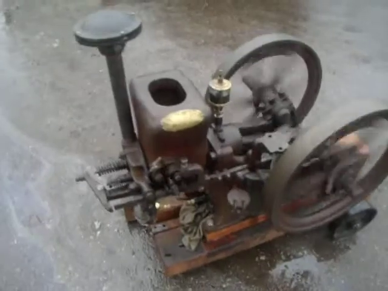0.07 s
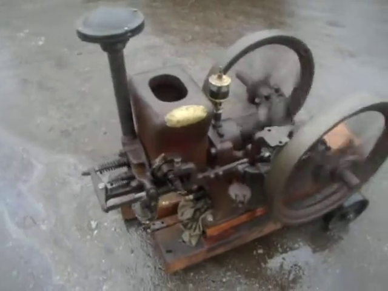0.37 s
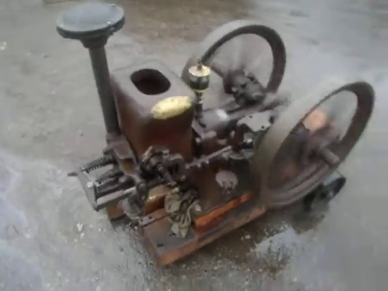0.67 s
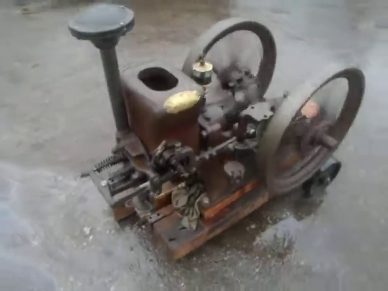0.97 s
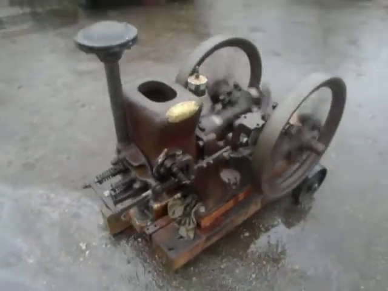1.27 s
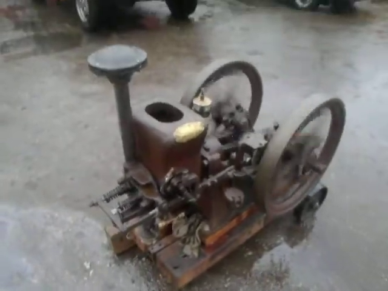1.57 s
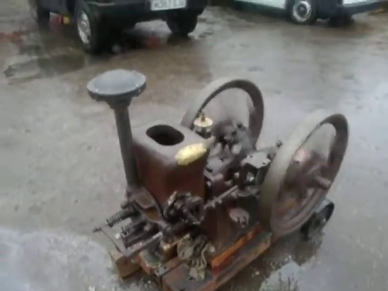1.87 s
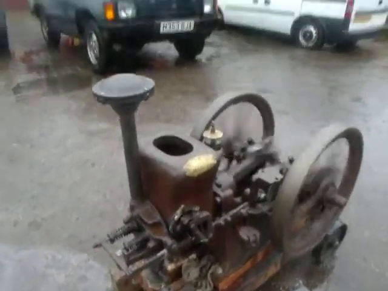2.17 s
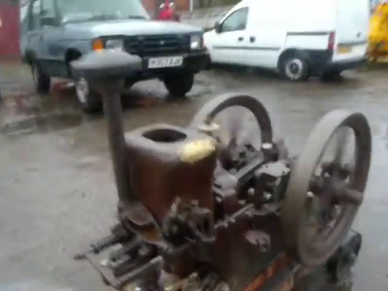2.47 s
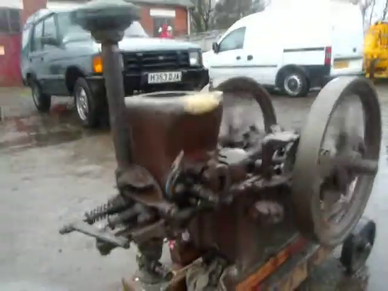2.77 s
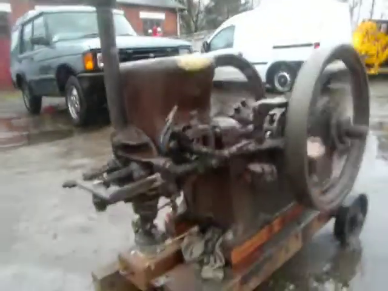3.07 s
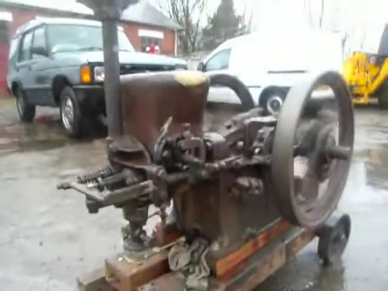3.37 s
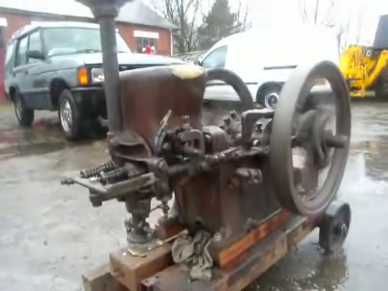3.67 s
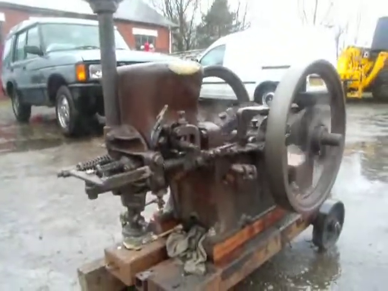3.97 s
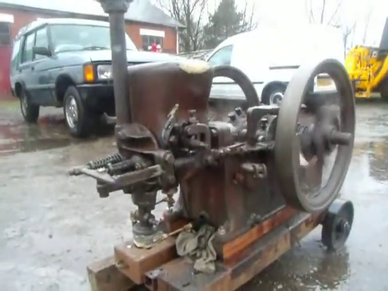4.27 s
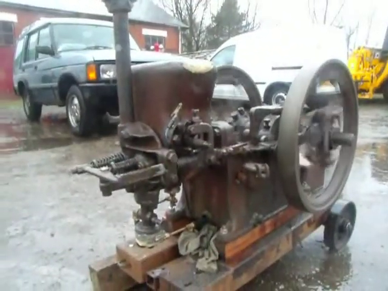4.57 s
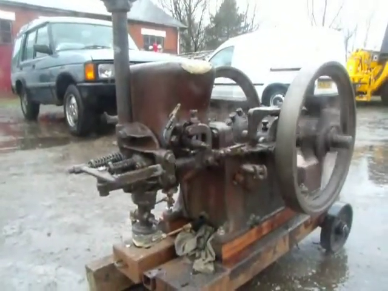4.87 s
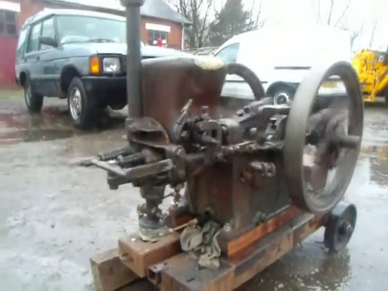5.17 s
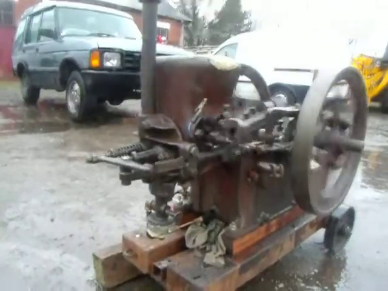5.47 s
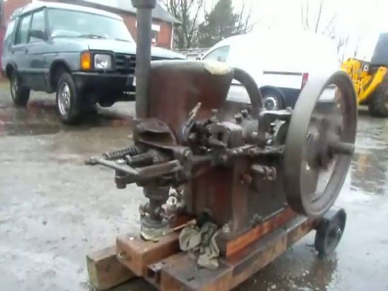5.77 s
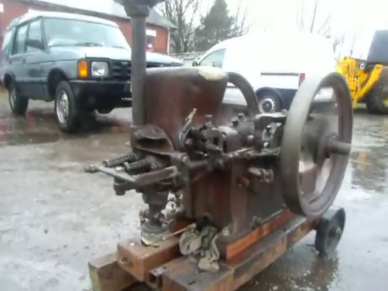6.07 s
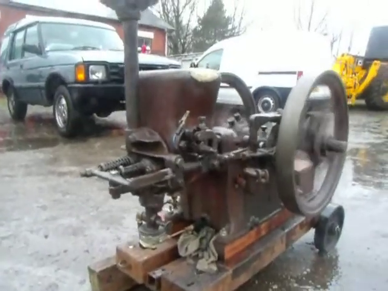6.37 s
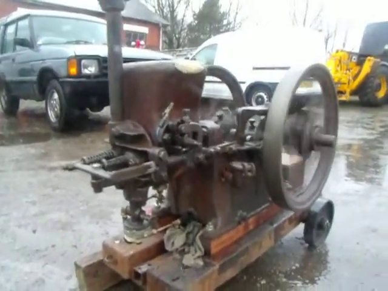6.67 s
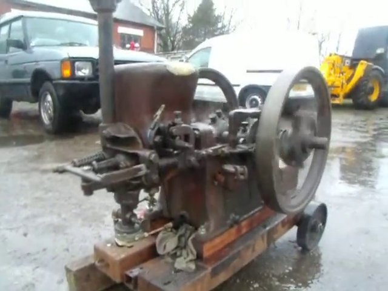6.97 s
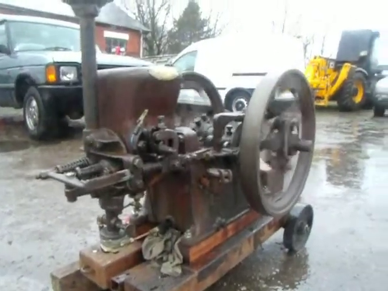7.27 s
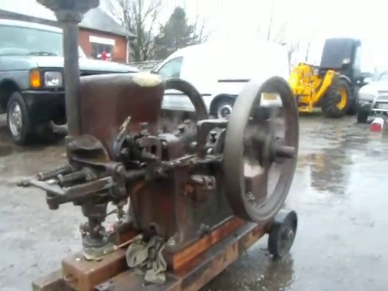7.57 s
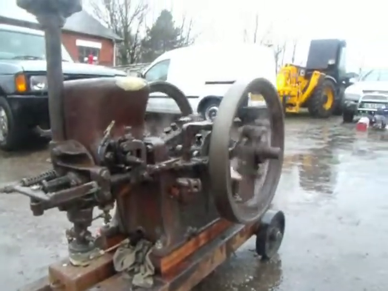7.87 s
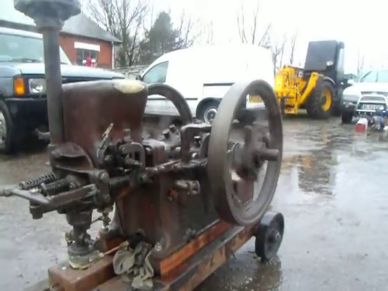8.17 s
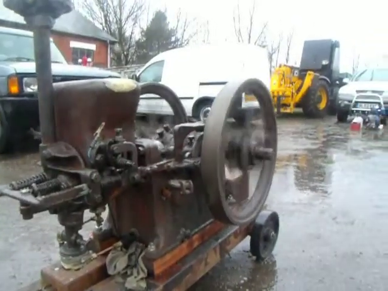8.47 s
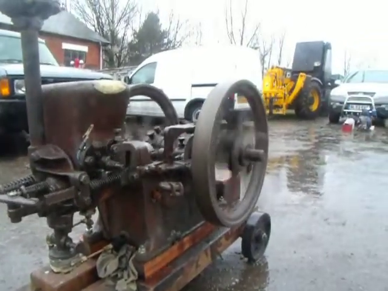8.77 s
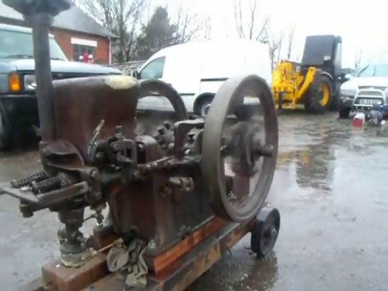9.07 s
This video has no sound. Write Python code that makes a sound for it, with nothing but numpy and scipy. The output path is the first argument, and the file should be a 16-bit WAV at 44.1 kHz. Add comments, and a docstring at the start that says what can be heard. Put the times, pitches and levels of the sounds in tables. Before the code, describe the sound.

An old stationary engine runs close by in a paved yard. It fires one loud bang almost at once, then coasts with knocking bearings, rattling gears and a clanking push rod. It fires three more times, about three seconds apart, each bang preceded by ringing metal clicks and slightly overloading the microphone. A second engine thumps quickly and evenly throughout, over a low machinery drone, with faint echoes from buildings.

```python
"""A hit-and-miss open-crank engine runs in a paved yard. From the outset machinery drones and a second,
unseen engine thumps at nearly six beats a second. The open-crank engine's gears rattle, its governor
lets go, the valve gear rings, and at a quarter second one charge fires, overloading the microphone.
The flywheels then coast, with knocking bearings and a clanking push rod, until the next firing, about
every three seconds. Buildings return echoes of both engines."""
import sys
import numpy as np
from scipy import signal
from scipy.fft import rfft, irfft, next_fast_len
from scipy.io import wavfile
from scipy.ndimage import map_coordinates

SR = 44100
rng = np.random.default_rng(int(sys.argv[2]) if len(sys.argv) > 2 else 0)


def transcribe(u):
    """Save the signal u as a 16-bit wav file named by the first command-line argument.

    u: samples, shape (n,) or (channels, n), limited to [-1, 1]; the rate is SR.
    q: integer samples, one column per channel.
    """
    v = np.clip(np.atleast_2d(u).T, -1, 1)
    q = np.round(v * 32767).astype(np.int16)
    wavfile.write(sys.argv[1], SR, q)


N = 411012

# Spectra of the sources. Each row: frequency in Hz, relative spectral density in dB.
DRONE_SPECTRUM = [(12, -50), (20, -10), (97, -5), (151, -3.5), (247, -4), (435, -9.5), (512, -9.5),
                  (633, -15.5), (944, -20.5), (1410, -21.5), (2000, -26), (5010, -39.5), (5500, -38.5),
                  (7150, -78), (12100, -120)]
EXHAUST_SPECTRUM = [(10, -50.5), (25, -27), (50, -9), (90, 0), (170, 3), (200, -2.5), (235, -25), (330, -8),
                    (520, -23.5), (680, -28), (1150, -29.5), (1500, -58.5), (5000, -58)]
PUFF_SPECTRUM = [(150, -0.5), (400, 4.5), (750, -2.5), (1150, 1), (1500, -13), (2000, -13.5), (5000, -22)]
TICK_SPECTRUM = [(500, -14), (1200, 1), (2000, 7), (3000, -3.5), (5000, -11.5)]
SCRAPE_SPECTRUM = [(800, -20.5), (1500, -6.5), (2100, 3), (2700, 3), (3500, -0.5), (5200, -3)]
CLANK_SPECTRUM = [(400, -23.5), (1200, 0), (2000, 10), (2700, 2), (3500, 5.5), (4300, 0.5), (5200, -4)]
SPRING_SPECTRUM = [(1000, -27.5), (2000, -18), (3000, -7.5), (4200, -3.5), (5200, 5), (6000, 1)]
BLAST_SPECTRUM = [(60, 2.5), (250, -3), (600, -1.5), (1400, -4), (3000, -8), (4200, -9.5), (5500, -7)]
# Resonances of casting and cam follower. Each row: frequency in Hz, bandwidth in Hz, gain in dB.
IRON_MODES = [(527, 129, -1), (660, 148, -3), (764, 79, 1.5), (944, 159, 1.5), (1023, 193, -1),
              (1175, 62, -1), (1446, 190, -11), (1835, 88, -11), (2003, 41, -8.5)]
FOLLOWER_MODES = [(965, 65, 2.5), (1110, 84, 1.5), (1174, 55, 6), (1450, 220, -5.5), (2260, 370, -12)]
# Modes of the steel trip lever and the crank. Each row: frequency in Hz, level in dB, t60 in seconds.
LEVER_MODES = [(1990, -18, .07), (4090, -7, .04)]
CRANK_MODES = [(530, 2, 0.05), (676, -10, 0.11), (768, -4.5, 0.044), (897, 3.5, 0.035), (1026, -1.5, 0.032),
               (1375, -6.5, .04), (1860, -1.5, 0.11), (2010, -10, .06)]

# The steady engine's drifting pace. Each row: time in seconds, exhaust strokes counted.
STEADY_PACE = [(-.013, 0), (1.0359, 6), (1.3795, 8), (1.8989, 11), (2.4119, 14), (3.0998, 18), (4.4789, 26),
               (4.9931, 29), (5.6724, 33), (7.2182, 42), (7.7292, 45), (8.0749, 47), (9.2784, 54)]
# Its valve taps. Each row: delay after the stroke in seconds, level in dB.
TAPPETS = [(.0025, 0), (.028, -5), (.0528, -5), (.1128, -5), (.1388, -6)]
# The open-crank flywheels coast, at first and after each firing.
# Each row: starting angle in turns, speed in turns per second, slowing in turns per second squared.
COASTS = [(1.05, 3.65, .67), (.102, 5.198, .669), (.072, 5.334, .731), (.147, 5.319, .638), (.1, 5.3, .67)]
# The microphone moves from above the engine to its side.
# Each row: time in seconds, level of the running gear in dB, centre of the knocks' spectrum in Hz.
VIEWPOINT = [(0, -1.5, 536), (1.2, -1, 505), (2.2, -3.5, 540), (3.2, 2, 760), (5, -0.5, 773),
             (9.3, -0.5, 796)]
# Gear load over the two-turn cycle. Each row: crank angle in turns, rattle in dB, scrape in dB.
GEAR_LOAD = [(.15, -27.5, -47.5), (.24, -25.5, -38.5), (.33, -27, -52), (0.452, -22, -40), (.6, -22.5, -44),
             (.72, -33, -47), (1.33, -29.5, -47), (1.421, -24, -40.5), (1.6, -27.5, -45.5),
             (1.719, -29, -43.5)]
# The valve gear trips twice before each firing.
# Each row: start in seconds, strike in dB, low ring in dB, high ring in dB.
TRIPS = [(-0.025, -6.5, -13, 1), (0.1575, -5.5, -5.5, -11), (2.7508, -7, -13, -4.5), (2.9352, -1, -7, -8),
         (5.49, -5, -1, 0.5), (5.6713, -4.5, -5, -7), (8.7101, -6, -20.5, -1), (8.907, -1, 8.5, -16)]
# The freed push rod chatters around each first trip, and forces the exhaust valve open after a firing.
# Each row: offset from that event in seconds, strike in dB, frame ring in dB.
RELEASE_CLANKS = [(-.073, -15.5, -14.5), (.03, -21, -29), (.062, -17, -16), (.085, -21, -24.5),
                  (.105, -24.5, -33), (.136, -25.5, -28.5)]
FIRING_CLANKS = [(.069, -16, -15), (.082, -19, -20)]
# The rod drops onto the governor's latch in idle cycles. Each row: start in seconds, level in dB.
LATCH_CLANKS = [(0.744, -18.5), (1.1633, -18), (1.6142, -19.5), (2.0951, -12.5), (2.6243, -12.5),
                (3.5164, -15.5), (3.9295, -12.5), (4.369, -19), (4.8435, -6), (5.3774, -19), (6.2369, -18),
                (6.6413, -15.5), (7.0699, -19), (7.5312, -13.5), (8.0287, -8)]
# Heavy blows hammer the bearings as the latch lets go before a trip, and after each firing. # Each row: start
# in seconds, level in dB, spectral centre in Hz.
HEAVY_KNOCKS = [(0.355, -7.5, 527), (2.624, -11, 956), (2.655, -9, 668), (2.674, -8.5, 545),
                (3.139, -10, 530), (5.861, -12, 837), (5.91, -8.5, 650), (8.608, -7.5, 584),
                (9.124, -10, 528), (9.151, -13, 668)]
# Firings of the open-crank engine. Each row: start in seconds, level in dB.
FIRINGS = [(0.2642, -2), (3.0434, 2), (5.776, 2.5), (9.0167, 2)]
# Colour of the echoes. Each row: frequency in Hz, relative level in dB.
ECHO_SPECTRUM = [(100, -3), (300, -6.5), (650, 4.0), (1200, 5), (2500, -15), (5000, -16)]
# Reverberation of the yard. Each row: frequency in Hz, t60 in seconds.
YARD_DECAY = [(100, 0.64), (600, 0.83), (1500, 0.35), (5000, 0.18)]
# The microphone's treble response. Each row: frequency in Hz, gain in dB.
MIC_RESPONSE = [(5100, 0.5), (5500, -13.5), (5900, -16), (6200, -34), (6500, -83.5)]


def amp(db):
    """Amplitude ratio of a level in decibels."""
    return 10 ** (np.asarray(db) / 20)


def unit(x):
    """Normalisation to rms 1."""
    return x / np.sqrt(np.mean(x ** 2) + 1e-20)


def along(points, hz):
    """Interpolation of (Hz, value) points on a logarithmic frequency axis."""
    knots, values = np.transpose(points)
    return np.interp(np.log(hz + 1), np.log(knots + 1), values)


def filtered(x, response):
    """Linear filtering: the spectrum of x times a frequency response."""
    size = next_fast_len(N + SR // 2)
    return irfft(rfft(x, size) * response(np.fft.rfftfreq(size, 1 / SR)), size)[:N]


def coloured(x, spectrum, size=8192):
    """Convolution with the minimum-phase, unit-energy response of a given spectrum."""
    cepstrum = irfft(np.log(amp(along(spectrum, np.fft.rfftfreq(size, 1 / SR)))))
    cepstrum[1:size // 2] *= 2
    cepstrum[size // 2 + 1:] = 0
    response = irfft(np.exp(rfft(cepstrum)))
    return signal.fftconvolve(x, response / np.linalg.norm(response))[:N]


def resonate(x, modes):
    """Forced vibration: x drives parallel damped resonators of alternating sign."""
    return filtered(x, lambda f: sum(
        (-1) ** k * amp(db) * 1j * f * width / (hz * hz - f * f + 1j * f * width)
        for k, (hz, width, db) in enumerate(modes)))


def add(track, s, sound):
    """Superposition of a sound on the track at s seconds."""
    start = round(s * SR)
    part = sound[max(-start, 0):max(N - start, 0)]
    track[max(start, 0):][:len(part)] += part


def bursts(rows, t60, tail_db, tail_t60):
    """Impact noise: each (seconds, dB) row starts an exponential decay with a weaker tail."""
    track, t = np.zeros(N), np.arange(SR // 4) / SR
    envelope = amp(-60 * t / t60) + amp(tail_db - 60 * t / tail_t60)
    for s, db in rows:
        add(track, s, amp(db) * envelope * rng.standard_normal(len(t)))
    return track


def distant_machinery(knots_per_s=14):
    """Amplitude modulation: a smooth random swell makes the low, far-off drone uneven."""
    knots = rng.standard_normal(int(N * knots_per_s / SR) + 4)
    swell_db = 1.6 * map_coordinates(knots, [np.arange(N) * knots_per_s / SR])
    return amp(-28.5 + swell_db) * unit(coloured(rng.standard_normal(N), DRONE_SPECTRUM))


def exhaust_beats():
    """Near-periodic strokes of the steady engine. Each row: start in seconds, level in dB."""
    s, counted = np.transpose(STEADY_PACE)
    times = np.interp(np.arange(counted[-1] + 1), counted, s)
    return list(zip(times, rng.normal(-1.56, 1.02, len(times))))


def strokes(beats, lag, scatter_db):
    """An impulse train of uneven strength, lag seconds behind the beats."""
    track = np.zeros(N)
    for s, db in beats:
        add(track, s + lag, amp([rng.normal(db, scatter_db)]))
    return track


def steady_engine(beats, intake_lag_s=.0902, wall_delay_s=.0245):
    """Pulsating flow radiates: each cycle expels a slug of gas and gulps air half a cycle later."""
    exhaust = amp(15) * coloured(strokes(beats, lag=.00037, scatter_db=.66), EXHAUST_SPECTRUM)
    t = np.arange(SR // 8) / SR - intake_lag_s
    # the air in the inlet swings as the valve opens and shuts
    gulp = np.exp(-((t - .001) / .0065) ** 2) * np.cos(2 * np.pi * 122 * t)
    intake = amp(-14.7) * signal.fftconvolve(strokes(beats, lag=0, scatter_db=.7), gulp)[:N]
    jets = [(s + .0015, db + rng.normal(0, 1.5)) for s, db in beats]
    puff = amp(-18) * coloured(bursts(jets, t60=.034, tail_db=-20, tail_t60=.1), PUFF_SPECTRUM)
    taps = [(s + lag + rng.normal(0, .0007), db + rng.normal(0, 2.2))
            for s, _ in beats for lag, db in TAPPETS]
    valves = amp(-29.5) * coloured(bursts(taps, t60=.037, tail_db=-26, tail_t60=.042), TICK_SPECTRUM)
    thumps = exhaust + intake + puff
    wall_echo = filtered(thumps, lambda hz: np.exp(-2j * np.pi * hz * wall_delay_s) / (1 + 1j * hz / 500))
    return valves + thumps + amp(-11) * wall_echo


def crank_angle():
    """Uniform deceleration: firings kick the flywheels and friction slows them. The angle is in turns."""
    t, angle = np.arange(N) / SR, np.zeros(N)
    for start, (turns, speed, slowing) in zip([0] + [s for s, _ in FIRINGS], COASTS):
        age = t - start
        angle = np.where(age >= 0, turns + speed * age - slowing * age ** 2 / 2, angle)
    return angle


def nearness_db(s):
    """The level of the running gear depends on the microphone's position at s seconds."""
    return np.interp(s, *np.transpose(VIEWPOINT)[:2])


def contacts(per_s, spread_db):
    """Shot noise: random metal contacts of uneven force, at rms 1."""
    hit = rng.random(N) < per_s / SR
    return unit(hit * rng.standard_normal(N) * amp(spread_db * rng.standard_normal(N)))


def gears(angle, lead_s=.19, width_s=.44):
    """Backlash and friction: loose gears rattle the frame, cam and rod scrape, both harder under load."""
    t = np.arange(N) / SR
    turns, *levels = np.transpose(GEAR_LOAD)
    rattle_db, scrape_db = [np.interp(angle, turns, db, period=2) + nearness_db(t) for db in levels]
    # extra load around compression and firing
    load = sum(np.exp(-((t - s + lead_s) / width_s) ** 2) for s, _ in FIRINGS)
    rattle = unit(resonate(contacts(per_s=600, spread_db=2.5), IRON_MODES))
    scrape = unit(coloured(contacts(per_s=2500, spread_db=0), SCRAPE_SPECTRUM))
    return amp(rattle_db + 2 * load - 5) * rattle + amp(scrape_db + 7 * load - 3) * scrape


def valve_gear():
    """Free vibration: the lever snaps over and rings in two modes; the spring sings with the higher."""
    ring, t = np.zeros(N), np.arange(SR // 4) / SR
    for s, _, *ring_db in TRIPS:
        for (hz, db, t60), strength_db in zip(LEVER_MODES, ring_db):
            add(ring, s, amp(db + strength_db - 60 * t / t60) * np.sin(2 * np.pi * hz * t))
    strike = bursts([row[:2] for row in TRIPS], t60=.041, tail_db=-19, tail_t60=.44)
    zing = bursts([(s, high_db) for s, _, _, high_db in TRIPS], t60=.048, tail_db=-13, tail_t60=.063)
    return ring + amp(-10) * coloured(strike, CLANK_SPECTRUM) + amp(-8) * coloured(zing, SPRING_SPECTRUM)


def valve_spring():
    """Repeated impact: the spring bounces and buzzes after the first trip of each pair."""
    t = np.arange(N) / SR
    shake = sum(amp(db) * np.exp(-((t - s - .06) / .082) ** 2) for s, db, *_ in TRIPS[::2])
    bounces = [(s + rng.uniform(.013, .11), rng.normal(0, 4.8))
               for s, *_ in TRIPS[::2] for _ in range(10)]
    buzz = bursts(bounces, t60=.017, tail_db=-21, tail_t60=.08)
    return amp(-16.5) * shake * coloured(buzz, SPRING_SPECTRUM)


def following(events, pattern):
    """Time shifting: the pattern's rows recur at each event."""
    return [(s + lag, *rest) for s, *_ in events for lag, *rest in pattern]


def push_rod(frame_db=-14.5):
    """Impact excitation: steel strikes steel, and the iron frame resonates under it."""
    idle = [(s, db, frame_db + nearness_db(s)) for s, db in LATCH_CLANKS]
    clanks = idle + following(TRIPS[::2], RELEASE_CLANKS) + following(FIRINGS, FIRING_CLANKS)
    s, strike_db, body_db = np.transpose(clanks)
    strike = coloured(bursts(zip(s, strike_db), t60=.022, tail_db=-13, tail_t60=.12), CLANK_SPECTRUM)
    body = resonate(bursts(zip(s, body_db), t60=.086, tail_db=-8, tail_t60=.079), IRON_MODES)
    return amp(-4.5) * strike + amp(10.5) * body


def passes(angle, t):
    """Times at which a rising angle passes a whole number."""
    return t[1:][np.diff(np.floor(angle)) > 0]


def piston_knocks(angle, return_turns=.555, scatter_db=.94, scatter_octaves=.15):
    """The piston reverses twice a turn. Each row: start in seconds, level in dB, centre in Hz."""
    t = np.arange(N) / SR
    view_s, _, view_hz = np.transpose(VIEWPOINT)
    outward = [(s, -14, np.interp(s, view_s, view_hz)) for s in passes(angle, t)]
    inward = [(s, -20.5, 520) for s in passes(angle - return_turns, t)]
    return [(s, rng.normal(db + nearness_db(s), scatter_db), hz * 2 ** rng.normal(0, scatter_octaves))
            for s, db, hz in outward + inward]


def bearings(blows, attack_s=.0007):
    """Modal ringing: bearing play knocks the crank, exciting most the modes near each blow's centre."""
    knocks, t = np.zeros(N), np.arange(SR // 4) / SR
    hz, db, t60 = np.transpose(CRANK_MODES)[:, :, None]
    for s, blow_db, centre_hz in blows:
        strength = amp(db + rng.normal(0, .97, hz.shape) - 10 * np.log2(hz / centre_hz) ** 2)
        detuned_hz = hz * rng.normal(1, .015, hz.shape)
        phase = 2 * np.pi * (detuned_hz * t + rng.random(hz.shape))
        ring = np.sum(strength * amp(-60 * t / t60) * np.sin(phase), axis=0) / np.linalg.norm(strength)
        add(knocks, s, amp(blow_db + 1.5) * ring * (1 - np.exp(-t / attack_s)))
    ticks = bursts([row[:2] for row in blows], t60=.039, tail_db=-17.5, tail_t60=.23)
    return knocks + amp(-18.5) * coloured(ticks, TICK_SPECTRUM)


def firings():
    """Pipe resonance and turbulence: a pressure wave rings the open exhaust and a short jet roars."""
    wave, jet, t = np.zeros(N), np.zeros(N), np.arange(SR // 4) / SR
    push = amp(8 - 60 * t / .015) * np.sin(2 * np.pi * 212 * t)
    surge = amp(-10 - 60 * t / .17) * np.sin(2 * np.pi * 46 * t)  # gas swings back in the pipe
    boom = amp(-4.5 - 60 * t / .045) * np.sin(2 * np.pi * 270 * t)  # the pipe rings on
    crack = np.exp(-((t - .0118) / .006) ** 2)
    flow = crack + amp(-6 - 60 * t / .14) * (1 - np.exp(-t / .002))
    for s, db in FIRINGS:
        add(wave, s, amp(db) * (push + boom + surge))
        add(jet, s - .003, amp(db) * flow * rng.standard_normal(len(t)))  # the opening valve hisses
    return wave + amp(-.5) * coloured(jet, BLAST_SPECTRUM)


def cam(angle, lobe_turns=.29, width_s=.023):
    """Contact noise: the follower chatters and resonates as it rides the lobe every second turn."""
    t = np.arange(N) / SR
    lobes = passes((angle - lobe_turns) / 2, t)
    pressure = sum(amp(-26 + nearness_db(s)) * np.exp(-((t - s) / width_s) ** 2) for s in lobes)
    return pressure * unit(resonate(contacts(per_s=1400, spread_db=2.5), FOLLOWER_MODES))


def echoes(x, delay_s):
    """Diffuse reflection from walls and parked vehicles; the treble dies first."""
    hz, t, noise = signal.stft(rng.standard_normal(SR // 2), SR, nperseg=256)
    colour = amp(along(ECHO_SPECTRUM, hz))[:, None]
    decay = amp(-60 * t / along(YARD_DECAY, hz)[:, None])
    tail = signal.istft(noise * colour * decay, SR, nperseg=256)[1]
    reflected = np.zeros(N)
    add(reflected, delay_s, signal.fftconvolve(x, tail / np.linalg.norm(tail)))
    return reflected


def scene():
    """Superposition of both engines, the echoes and the drone in one channel."""
    angle = crank_angle()
    clatter = push_rod() + bearings(HEAVY_KNOCKS + piston_knocks(angle)) + valve_gear() + valve_spring()
    bangs = firings()
    reflected = amp(-20) * echoes(clatter, delay_s=.015) + amp(-23) * echoes(bangs, delay_s=.03)
    engines = steady_engine(exhaust_beats()) + clatter + cam(angle) + gears(angle) + bangs
    return (engines + reflected + distant_machinery())[None]


def record(dry, top_hz=15760):
    """Overload: the microphone clips the bangs and passes little above 5 kHz; overshoots clip again."""
    x = np.clip(dry[0], -.67, .67)
    x = filtered(x, lambda hz: amp(along(MIC_RESPONSE, hz)))
    x = np.clip(x, -.73, .73)
    return filtered(x, lambda hz: hz < top_hz)[None]


dry = scene()
out = record(dry)
transcribe(out)
```